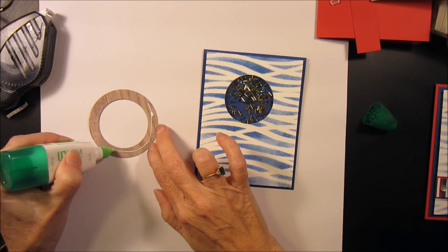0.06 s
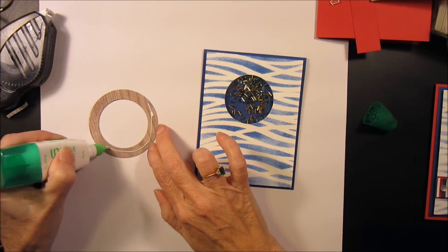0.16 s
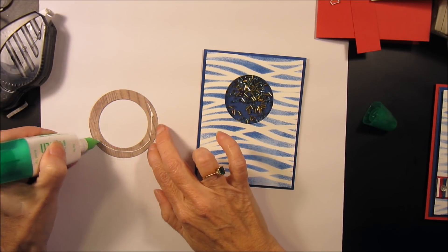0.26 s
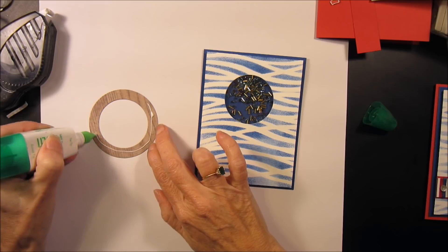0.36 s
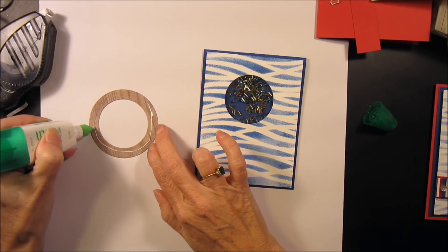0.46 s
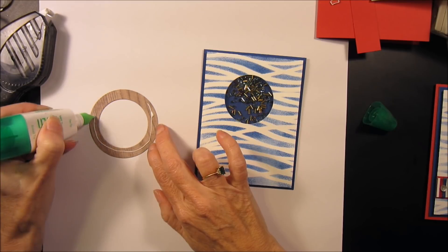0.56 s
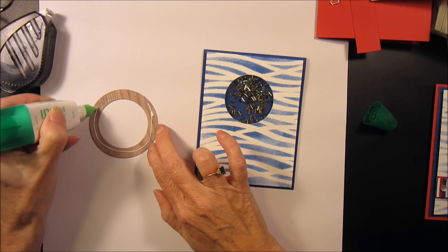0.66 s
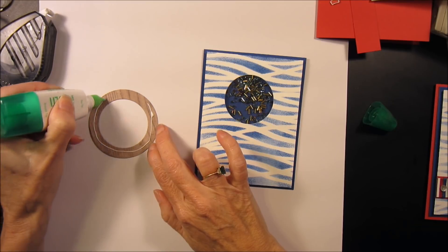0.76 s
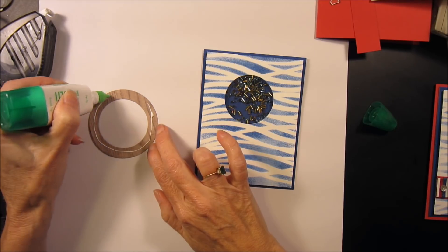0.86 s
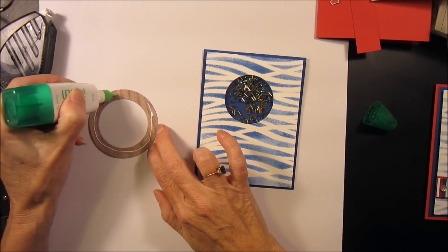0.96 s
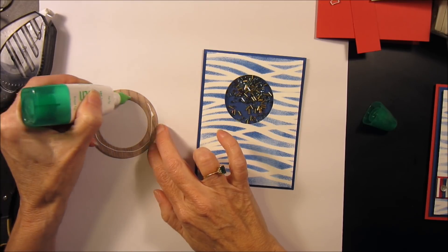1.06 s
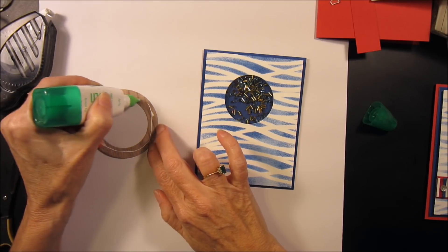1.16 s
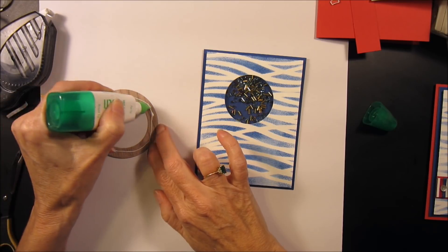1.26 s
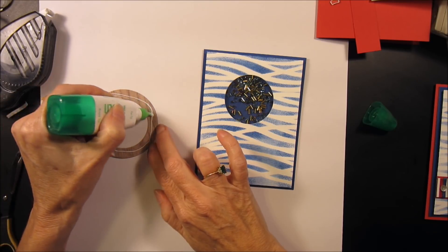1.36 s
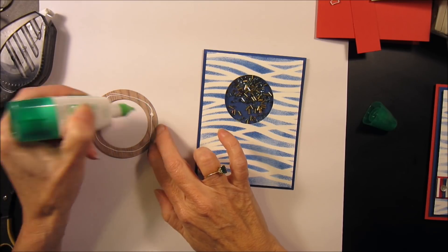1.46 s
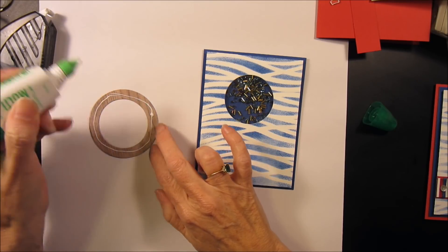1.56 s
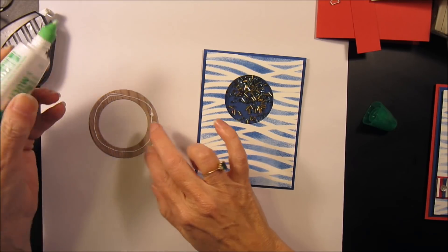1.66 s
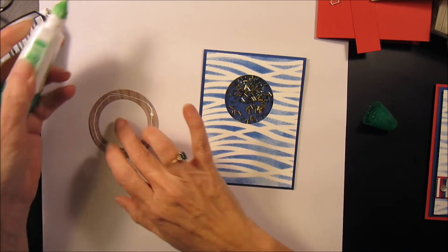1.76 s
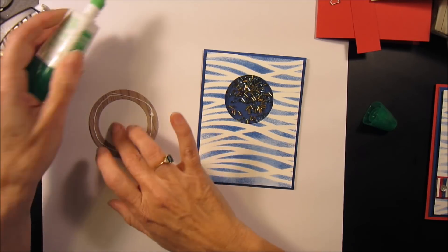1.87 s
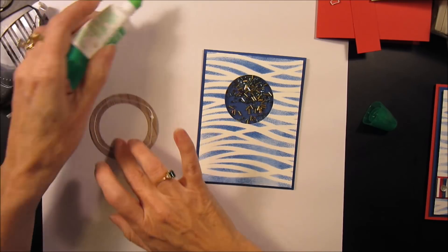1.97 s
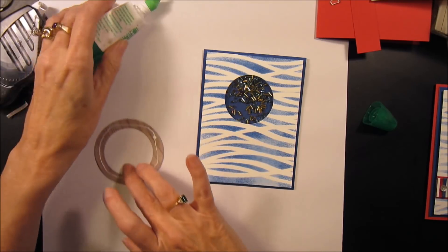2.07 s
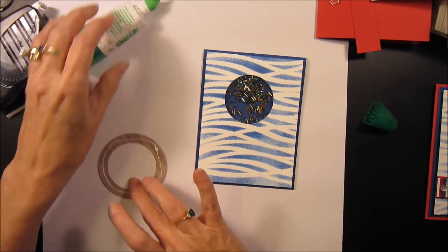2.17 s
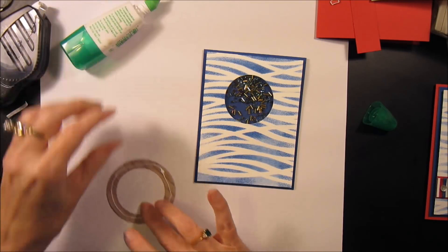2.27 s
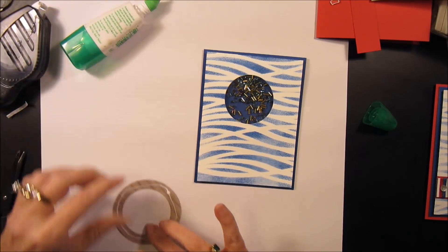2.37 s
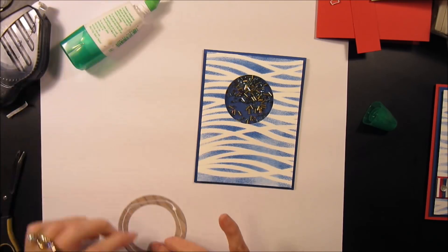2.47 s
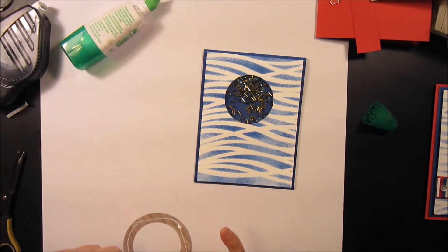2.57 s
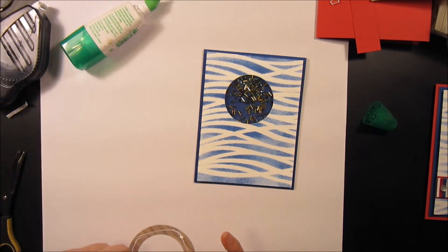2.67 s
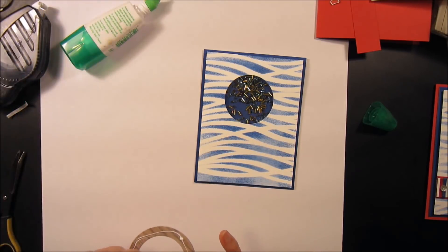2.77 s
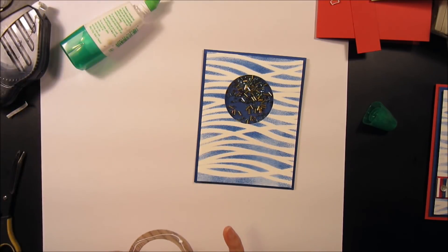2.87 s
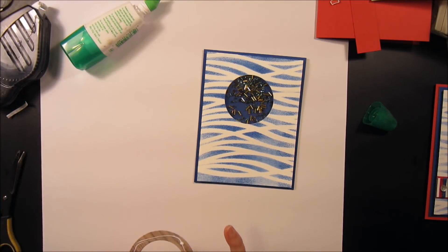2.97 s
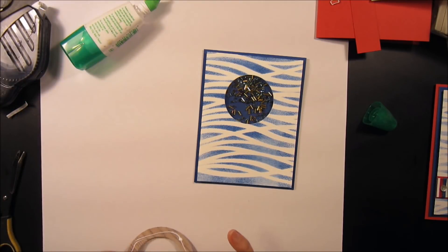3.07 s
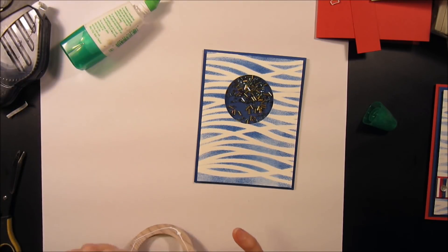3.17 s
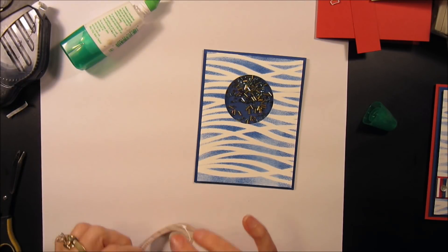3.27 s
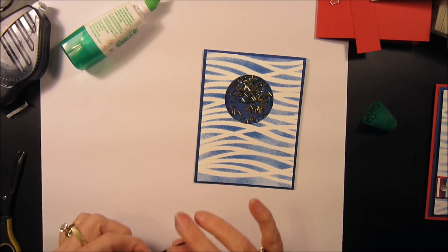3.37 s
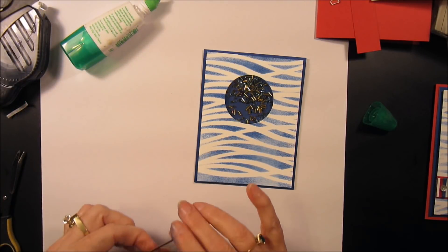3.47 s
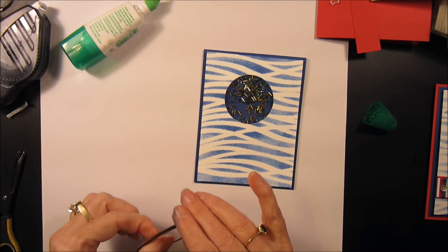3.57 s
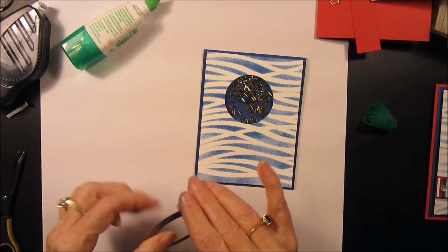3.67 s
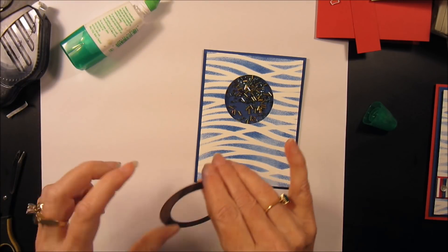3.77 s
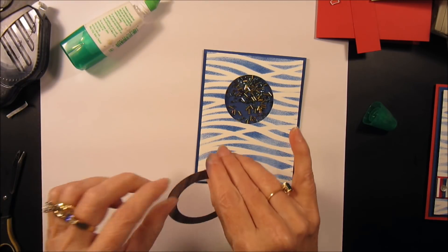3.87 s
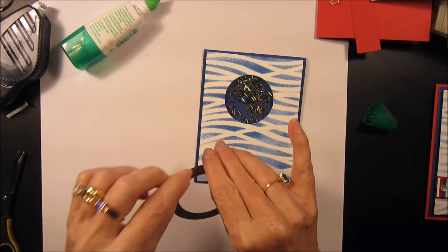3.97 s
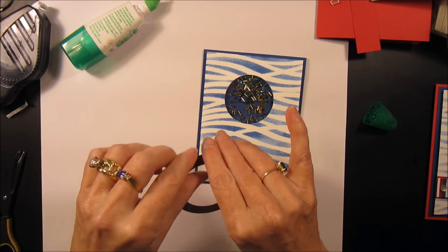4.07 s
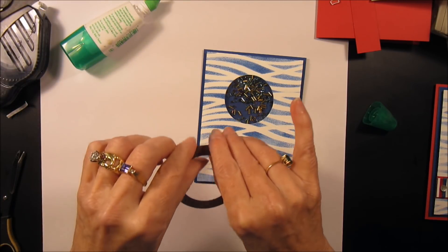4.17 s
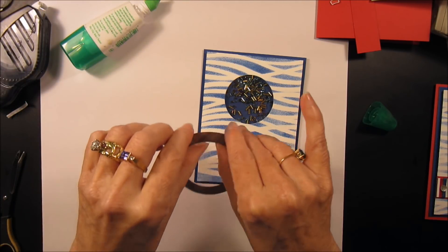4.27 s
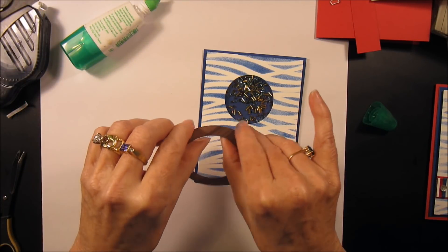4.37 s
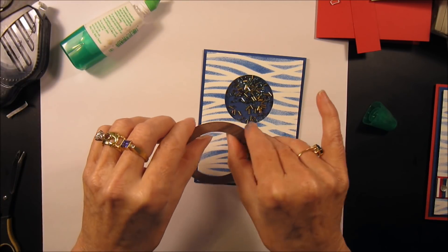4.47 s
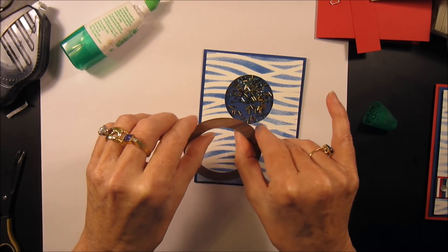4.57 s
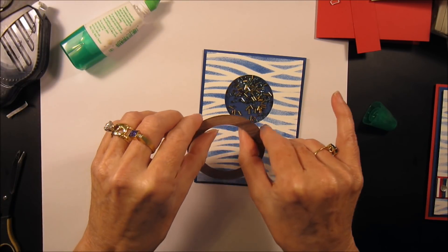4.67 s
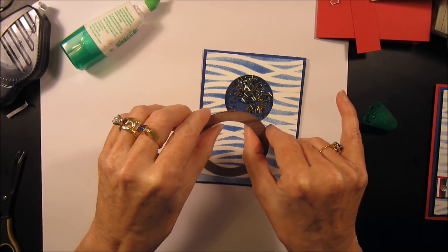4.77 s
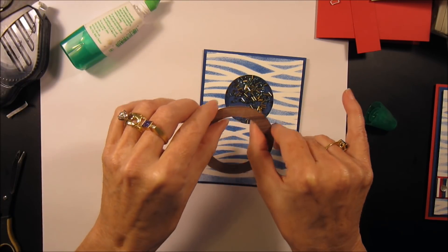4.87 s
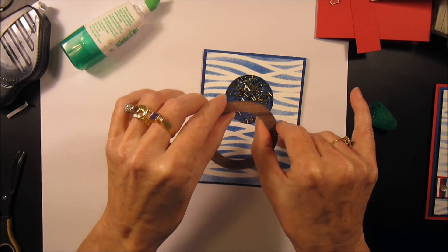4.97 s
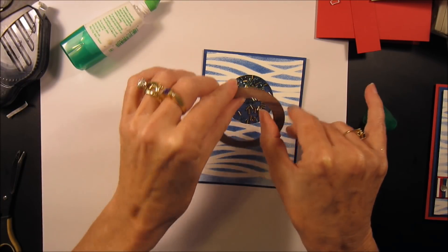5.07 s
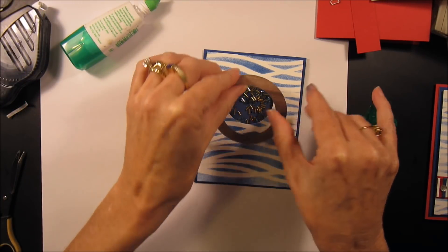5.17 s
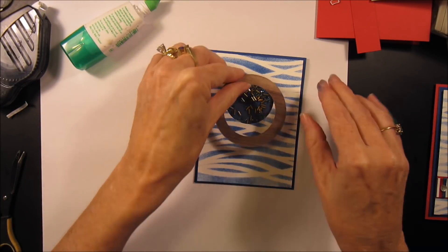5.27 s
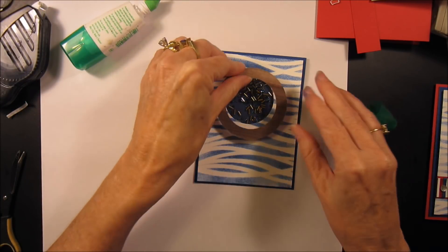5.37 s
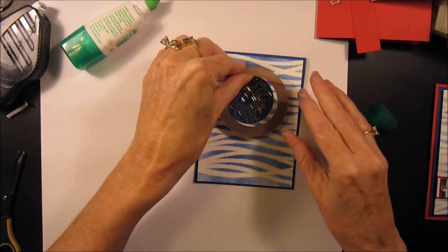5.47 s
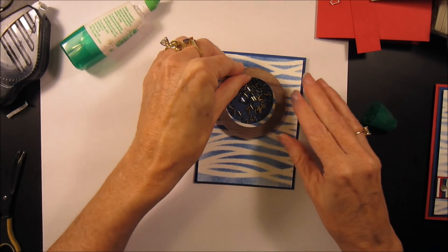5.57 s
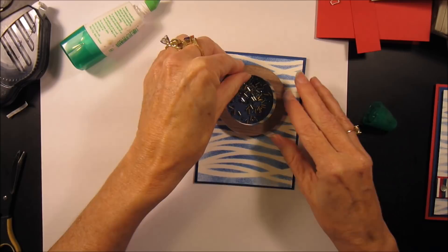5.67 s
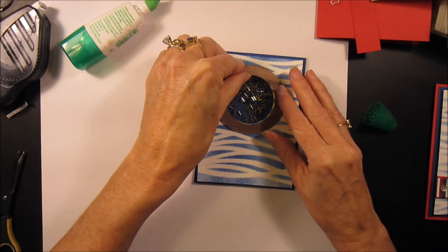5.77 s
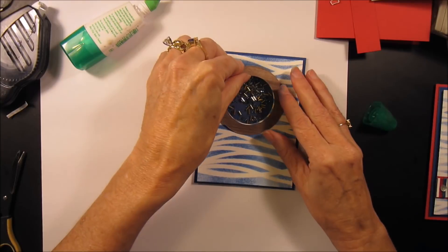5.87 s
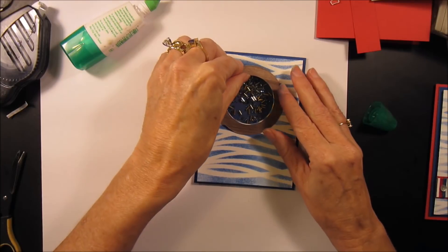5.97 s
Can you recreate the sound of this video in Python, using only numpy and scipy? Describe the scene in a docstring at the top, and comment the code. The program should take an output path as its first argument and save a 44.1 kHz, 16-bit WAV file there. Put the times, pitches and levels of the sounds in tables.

```python
"""Card making at a table

In a quiet room, heard from above: a plastic glue bottle is put down with a double clack, then tips
onto its side with a thump. Dying tones make its shell and the table; noise bursts make the contacts.
A glued card ring slides over paper, is peeled up and placed: clumps of tiny clicks, shaped in colour.
Small tacky ticks are short bursts of noise. Beneath lie a hum of coloured noise and a thin, stuttering whine.
"""
import sys
import numpy as np
from scipy import signal
from scipy.fft import rfft, irfft
from scipy.io import wavfile
from scipy.ndimage import uniform_filter1d

SR = 44100
rng = np.random.default_rng(int(sys.argv[2]) if len(sys.argv) > 2 else 0)


def bounce(signal):
    """Save signal as a 16-bit WAV file at the path given by the first command-line argument."""
    frames = np.transpose(np.atleast_2d(signal))
    limited = np.clip(frames, -1, 1)
    pcm = np.round(limited * 32767).astype(np.int16)
    wavfile.write(sys.argv[1], SR, pcm)


N = 266099  # length of the scene in samples

# In all tables, t60_s is the time a sound takes to die by 60 dB. Spectrum levels are relative.

# Colour of the room hum: pitch_hz, level_db
HUM_SPECTRUM = [(15, -13), (28, -3), (64, -3), (105, -3), (150, -2.5), (320, -7.5), (480, -9.5),
                (900, -14.5), (1700, -15), (2400, -18.5), (4500, -21), (6500, -23.5), (9500, -24.5),
                (15800, -32.5)]
HUM_DB = -60.5
WHINE_HZ, SLIPS_PER_S = 7852, 29.97

# How long the room's echo lasts at each pitch: pitch_hz, t60_s
ROOM_DECAY = [(100, 0.39), (400, 0.21), (1500, 0.39), (4000, 0.44), (8000, 0.26), (15000, 0.038)]
# Colour of the room's echo at its start: pitch_hz, level_db
ROOM_COLOUR = [(100, 6), (400, 5), (1300, -2.5), (4000, -6), (8000, -6), (15000, 10.5)]
# Reflections from near surfaces: delay_s, gain (plain factor)
ECHOES = [(.0046, -0.13), (.0064, -0.13), (.017, .125), (0.0199, -0.054)]
# A clack scattered by the room: pitch_hz, level_db
CLACK_WASH = [(200, -22), (600, 1), (850, -7), (1500, -2), (2300, -5), (3000, -7), (4200, -4), (5500, -9),
              (9000, -18), (15000, -23)]
# A thump scattered by the room: pitch_hz, level_db
THUMP_BOOM = [(50, -24), (80, -21), (125, -6), (250, -2), (450, -2), (700, -3), (900, -10), (2000, -40)]

# Loudness of the ring sliding over the paper, before the fizz is raised: time_s, level_db
SLIDE_LEVEL = [(1.97, -67), (2.015, -58.5), (2.13, -56), (2.22, -59), (2.33, -55.5), (2.45, -54),
               (2.5, -56), (2.56, -54.5), (2.7, -63), (2.81, -71)]
# Colour of card on paper: pitch_hz, level_db
PAPER_SPECTRUM = [(300, -19), (1000, -12), (2500, -11), (5000, -2), (8000, -1.5), (11500, -1),
                  (13500, -4.5), (15800, -6.5)]
FIZZ_DB, DULL_DB, DULL_FROM_S, DULL_S = 6, 5.5, 2.37, 0.12  # top fizz boost; how far, when and how long it falls

# Rubs of card, fingertips and the glue nozzle: start_s, length_s, level_db, centre_hz, width_octaves
SCUFFS = [(0, 0.17, -64, 7500, 2.5), (1.588, .04, -62, 11000, .9), (1.635, .015, -58, 11500, 0.56),
          (1.65, 0.071, -57.5, 4170, 1.5), (1.737, 0.024, -55.5, 8460, 0.71),
          (2.403, 0.083, -57.5, 9300, 0.29), (2.453, 0.035, -56.5, 4000, 1.2),
          (2.515, 0.11, -56.5, 2660, .48), (2.52, 0.065, -56, 7800, 0.27), (2.64, 0.029, -46.5, 3800, 7.8),
          (2.661, 0.042, -51, 2000, 2.9), (2.869, 0.085, -53.5, 10100, 0.76),
          (2.928, 0.0091, -47, 3220, 1.9), (2.948, 0.074, -62.5, 9500, 0.87),
          (3.112, 0.085, -64, 7000, 1.8), (3.206, 0.11, -59, 6200, 2), (3.359, 0.056, -70, 5500, 1.2)]
SCUFF_RISE, SCUFF_FALL = 0.24, 0.33  # shares of a rub's length

# Snaps of tacky glue and plastic, before a shared level trim: start_s, level_db
SNAPS = [(1.5794, -36), (1.5924, -30.5), (1.6056, -30.5), (1.611, -33.5), (1.6403, -28.5), (1.676, -36.5),
         (2.731, -38.5), (2.9626, -40), (2.9766, -30.5)]
SNAP_HZ, SNAP_OCTAVES, SNAP_T60_S = 10600, 0.48, 0.0028
# Taps of nails, card edges and the bottle's rim, before a shared level trim:
# start_s, level_db, centre_hz, width_octaves, t60_s
TAPS = [(1.4299, -45, 2000, 1.3, 0.0038), (1.6227, -47.5, 3300, 0.49, 0.011),
        (2.1232, -24, 7500, 0.76, 0.0025), (2.1249, -22.5, 8500, .7, 0.0049),
        (2.1383, -26, 8500, 1.4, 0.0066), (2.637, -36, 4600, 5.6, 0.018), (2.928, -45.5, 1200, 1.6, 0.018),
        (2.952, -42, 5000, 2.4, .01), (3.395, -45.5, 3000, 2.8, .008), (4.1760, -47, 1500, .7, 0.016),
        (5.5874, -34, 3550, .32, 0.02), (5.592, -44, 6000, 0.69, 0.025)]

# Colour of the ring's edge scraping off the paper: pitch_hz, level_db
PEEL_SPECTRUM = [(710, -55), (1200, -31), (2050, -11.5), (2650, -7.5), (2860, -4), (3460, -11),
                 (3770, -3.5), (4880, -2.5), (8790, -10.5), (10900, -1.5), (15500, -13.5)]
PEEL_START_S, PEEL_LENGTH_S, PEEL_DB = 3.324, 0.031, -41.5
# Colour of the ring brushing the card: pitch_hz, level_db
LANDING_SPECTRUM = [(1530, -44), (2600, -18), (3130, -7), (4190, -13), (5020, -3.5), (6660, -12),
                    (9680, 0.5), (15500, -20)]
LANDING_START_S, LANDING_LENGTH_S, LANDING_DB = 5.1148, 0.02, -47
PEEL_RISE, LANDING_RISE, SCRAPE_FALL = 0.49, 0.15, 0.21  # shares of a scrape's length
# Tones of the card ring as it knocks into place: pitch_hz, level_db, t60_s
CARD_TONES = [(1060, 3, .026), (2080, 0, 0.024)]
SEAT_START_S, SEAT_DB = 5.1248, -46.5

# Blows of the bottle: start_s, shell_db, hardness_hz (higher pitches are weaker), thump_db,
# lowest_thump_hz, crack_db, lowest_crack_hz, highest_crack_hz
BLOWS = [(1.8554, -14, 2300, -36, 220, -25, 600, 14000), (1.8770, -14.5, 4000, -47, 220, -26, 1300, 12000),
         (2.0746, -33, 1800, -74, 220, -40.5, 900, 6000),
         (2.1254, -43, 1700, -18.5, 111, -22.5, 1100, 3000),
         (2.1393, -37, 3000, -32, 105, -20.5, 1500, 12000), (2.1415, -43, 2500, -30, 105, -27, 1500, 7000)]
# Tones of the bottle's shell: pitch_hz, level_db, t60_s
BOTTLE_TONES = [(670, -18, 0.046), (906, -9.5, 0.014), (1157, -11.5, 0.033), (1400, -8.8, .02),
                (1640, -3, 0.0093), (1980, -13.5, 0.024), (2320, -4.1, 0.01), (2510, -17.5, 0.042),
                (3310, -22, 0.028), (3880, -5.5, .023), (4110, -2, .018), (4416, 2, 0.0051),
                (5420, 0.5, 0.014), (6500, -1.2, .0067), (7210, -8, .016)]
# Tones of the table top: pitch_hz, level_db, t60_s
TABLE_TONES = [(67.6, -37, .2), (116.3, -27, 0.38), (141, -16.5, .26), (178, -24, .28), (210, -19, 0.21),
               (256, -16, 0.17), (302, -17, 0.15), (340, -23.5, 0.27), (440, -4.5, 0.06),
               (482, -13.5, 0.11), (566, -12.5, 0.11), (615, -11.5, .06), (701, -32, .18), (875, -32, .046)]
# Faint lasting tones that a clack wakes around the table: pitch_hz, level_db, t60_s
LASTING_TONES = [(239, -40.5, .33), (602, -36, 0.22), (997, -28, .27), (1178, -29, 0.5), (1217, -23, 0.15),
                 (1374, -32, .24), (1730, -26, .42), (2333, -41, .38), (2540, -36, .3), (3860, -31, .28),
                 (4045, -35, .28)]
# Colour of the crack at the contact: pitch_hz, level_db
CRACK_SPECTRUM = [(200, -40), (1000, 3.5), (1900, 7), (3300, 1.5), (5000, 0), (8000, -7), (12000, -11.5),
                  (15500, -18)]


def gain_of(db):
    """Turns decibels into a plain gain."""
    return 10 ** (np.asarray(db) / 20)


def evened(x):
    """Scales a sound to an average (rms) level of 1."""
    return x / np.sqrt(np.mean(x ** 2) + 1e-20)


def read(points, hz):
    """Reads a table of values by pitch, with pitch on a log scale."""
    point_hz, value = np.transpose(points)
    return np.interp(np.log(hz + 1), np.log(point_hz + 1), value)


def add(mix, start_s, sound):
    """Mixes a sound in at a given time."""
    part = mix[max(round(start_s * SR), 0):][:len(sound)]
    part += sound[:len(part)]


def coloured(x, points):
    """Shapes a sound with a spectrum, at rms 1."""
    hz = np.fft.rfftfreq(len(x), 1 / SR)
    return evened(irfft(rfft(x) * gain_of(read(points, hz)), len(x)))


def band(x, centre_hz, octaves):
    """Keeps a bell-shaped band of a sound, at rms 1."""
    hz = np.fft.rfftfreq(len(x), 1 / SR) + 1
    away = np.log2(hz / centre_hz) / octaves
    return evened(irfft(rfft(x) / (1 + away ** 2 / 2) ** 2, len(x)))


def low_cut(x, hz):
    """Thins out what lies below hz."""
    return signal.sosfilt(signal.butter(2, hz, "high", fs=SR, output="sos"), x)


def high_cut(x, hz):
    """Dulls what lies above hz."""
    return signal.sosfilt(signal.butter(2, hz, fs=SR, output="sos"), x)


def fibres(size, per_s):
    """Paper fibres catch and let go: dense tiny clicks of uneven size, in clumps."""
    grip_db = 2 * evened(uniform_filter1d(rng.standard_normal(size), size=160))
    clicks = rng.standard_normal(size) * gain_of(grip_db)
    return clicks * (rng.random(size) < per_s / SR)


def swell(length_s, rise, fall):
    """Rise, hold and release of a rub."""
    done = np.arange(SR // 2) / SR / length_s
    return np.clip(np.minimum(done / rise, (1 - done) / fall), 0, 1)


def patchy(x, patchy_db):
    """The contact shifts, so the colour of a rub wanders at random."""
    z = signal.stft(x, nperseg=512)[2]
    patches = rng.standard_normal(z.shape)
    for axis in (0, 1):  # smooth over pitch, then over time
        patches = uniform_filter1d(patches, size=14, axis=axis)
    wandering = signal.istft(z * gain_of(patchy_db * evened(patches)), nperseg=512)[1]
    return evened(wandering[:len(x)])


def click(hz, octaves, t60_s):
    """A burst of noise in one band that dies quickly."""
    t = np.arange(SR // 20) / SR
    return band(rng.choice([-1., 1.], len(t)), hz, octaves) * gain_of(-60 * t / t60_s)


def ring(tones, t, hardness_hz, phases):
    """Sums dying tones; a softer contact weakens the high ones."""
    out = np.zeros(len(t))
    for phase, (hz, db, t60_s) in zip(phases, tones):
        softening = np.hypot(1, (hz / hardness_hz) ** 2)
        out += gain_of(db - 60 * t / t60_s) * np.sin(2 * np.pi * hz * t + phase) / softening
    return out


def room_tone(whine_db=-72, slip_rad=3.3):
    """Steady ventilation hum, and a thin whine whose phase creeps on and jumps back many times a second."""
    t = np.arange(N) / SR
    creep = (SLIPS_PER_S * t + rng.random()) % 1
    whine = np.sin(2 * np.pi * WHINE_HZ * t + slip_rad * creep)
    hum = coloured(rng.standard_normal(N), HUM_SPECTRUM)
    return gain_of(HUM_DB) * hum + gain_of(whine_db) * evened(whine)


def room(x, tail_db=-7.0, build_s=0.004):
    """A few near reflections, and a small room's tail with each band dying at its own speed."""
    taps = rng.choice([-1., 1.], SR) * (rng.random(SR) < 1 / 8)
    hz, t, z = signal.stft(taps, SR, nperseg=256)
    decay_db = read(ROOM_COLOUR, hz)[:, None] - 60 * t / read(ROOM_DECAY, hz)[:, None]
    tail = signal.istft(z * gain_of(decay_db), SR, nperseg=256)[1][:SR]
    tail *= 1 - np.exp(-(np.arange(SR) / SR / build_s) ** 2)
    response = gain_of(tail_db) * tail / np.linalg.norm(tail) / 2  # tail_db is set before the halving
    for delay_s, gain in ECHOES:
        add(response, delay_s, gain * np.array([1, 2, 1]) / 4)  # cluttered surfaces dull the echo
    return signal.fftconvolve(x, response)[:N]


def wash(wash_db=-34, wash_t60_s=0.46, boom_db=-26.0, boom_t60_s=0.4, build_s=0.0028):
    """Shell and table also radiate sideways; that sound returns from all round the room as a dense wash."""
    out, t = np.zeros(N), np.arange(SR // 2) / SR
    build = 1 - np.exp(-t / build_s)
    for start_s, shell_db, _, thump_db, *_ in BLOWS:
        clack = coloured(rng.standard_normal(len(t)), CLACK_WASH)
        add(out, start_s, build * gain_of(shell_db + wash_db - 60 * t / wash_t60_s) * clack)
        boom = coloured(rng.standard_normal(len(t)), THUMP_BOOM)
        add(out, start_s, build * gain_of(thump_db + boom_db - 60 * t / boom_t60_s) * boom)
    return out


def ticks(trim_db=-4):
    """Snaps are all thin and bright; each tap takes its colour and length from the spot that is touched."""
    out = np.zeros(N)
    for start_s, db in SNAPS:
        add(out, start_s, gain_of(db + trim_db) * click(SNAP_HZ, SNAP_OCTAVES, SNAP_T60_S))
    for start_s, db, hz, octaves, t60_s in TAPS:
        add(out, start_s, gain_of(db + trim_db) * click(hz, octaves, t60_s))
    return out


def scuffs():
    """Short rubs: each is a swell of fibre clicks in one band."""
    out = np.zeros(N)
    for start_s, length_s, db, hz, octaves in SCUFFS:
        press = swell(length_s, SCUFF_RISE, SCUFF_FALL)
        rub = band(fibres(size=len(press), per_s=18000), hz, octaves)
        add(out, start_s, gain_of(db) * press * rub)
    return out


def slide(fizz_hz=10500):
    """The ring is drawn to the table's edge with a fine dry hiss that dulls as it slows."""
    t = np.arange(N) / SR
    db = np.interp(t, *np.transpose(SLIDE_LEVEL), left=-np.inf, right=-np.inf)  # silent outside the slide
    fizz_db = FIZZ_DB - DULL_DB * np.clip((t - DULL_FROM_S) / DULL_S, 0, 1)
    hiss = patchy(coloured(fibres(size=N, per_s=14000), PAPER_SPECTRUM), patchy_db=2.0)
    body = signal.sosfiltfilt(signal.butter(2, fizz_hz, fs=SR, output="sos"), hiss)
    fizz = hiss - body
    return gain_of(db) * (body + gain_of(fizz_db) * fizz)


def scrape(start_s, length_s, db, rise, spectrum):
    """The ring's edge on paper or card: one bright scrape of fibre clicks that builds and lets go."""
    out, press = np.zeros(N), swell(length_s, rise, SCRAPE_FALL)
    rub = coloured(fibres(size=len(press), per_s=17000), spectrum)
    add(out, start_s, gain_of(db) * press * rub)
    return out


def card_ring(hardness_hz=9000, knock_db=-43):
    """The ring is peeled off the paper; later it brushes the card and seats with a small dry knock."""
    peel = scrape(PEEL_START_S, PEEL_LENGTH_S, PEEL_DB, PEEL_RISE, PEEL_SPECTRUM)
    landing = scrape(LANDING_START_S, LANDING_LENGTH_S, LANDING_DB, LANDING_RISE, LANDING_SPECTRUM)
    out = peel + landing
    t = np.arange(SR // 10) / SR
    tones = ring(CARD_TONES, t, hardness_hz, np.zeros(len(CARD_TONES)))
    add(out, SEAT_START_S, gain_of(SEAT_DB) * tones)
    add(out, SEAT_START_S, gain_of(knock_db) * click(hz=1150, octaves=1, t60_s=0.023))
    return out


def bottle(crack_t60_s=0.017, crack_rise_s=0.000092, table_hardness_hz=1200, lead_rad=0.078):
    """Each blow cracks at the contact, rings the plastic shell, leaves faint lasting tones and shakes the table."""
    out, t = np.zeros(N), np.arange(SR // 2) / SR
    # the table is pushed down as a whole, so its tones start together
    board = ring(TABLE_TONES, t, table_hardness_hz, np.full(len(TABLE_TONES), lead_rad))
    opposite = np.pi * np.arange(len(BOTTLE_TONES))  # neighbouring shell tones swing opposite ways
    for start_s, shell_db, hardness_hz, thump_db, thump_low_hz, crack_db, crack_low_hz, crack_high_hz in BLOWS:
        thump = low_cut(board, thump_low_hz)  # a light blow moves little bass
        shell = ring(BOTTLE_TONES, t, hardness_hz, opposite)
        lasting = ring(LASTING_TONES, t, hardness_hz, np.zeros(len(LASTING_TONES)))
        burst = gain_of(crack_db - 60 * t / crack_t60_s) * (1 - np.exp(-t / crack_rise_s))
        noise = coloured(rng.choice([-1., 1.], len(t)), CRACK_SPECTRUM)
        crack = high_cut(low_cut(burst * noise, crack_low_hz), crack_high_hz)
        add(out, start_s, gain_of(shell_db) * (shell + lasting) + gain_of(thump_db) * thump + crack)
    return out


def scene():
    """Everything on the table, its reflections and the room tone."""
    near = bottle() + ticks() + scuffs() + card_ring() + slide()
    return (near + room(near) + wash() + room_tone())[None]


def record(dry, top_hz=14000, edge_hz=15950):
    """The microphone softens the top octave; then a steep filter removes what lies above edge_hz."""
    soft = signal.sosfilt(signal.butter(3, top_hz, fs=SR, output="sos"), dry)
    edge = signal.firwin(511, edge_hz, window=("kaiser", 9), fs=SR)
    return signal.oaconvolve(soft, edge[None], "same")


dry = scene()
out = record(dry)
bounce(out)
```